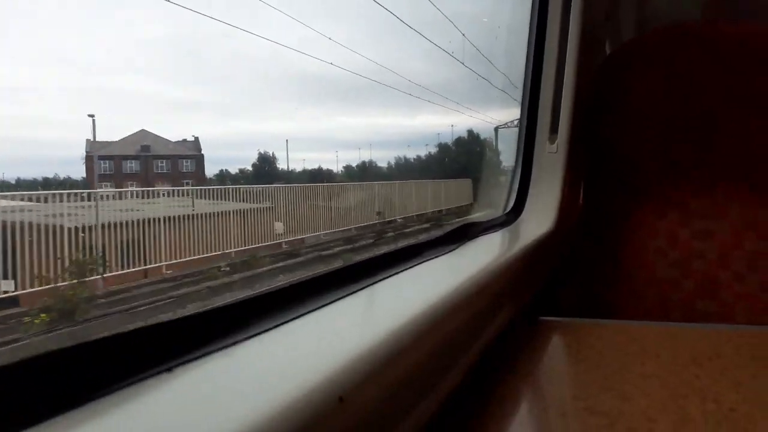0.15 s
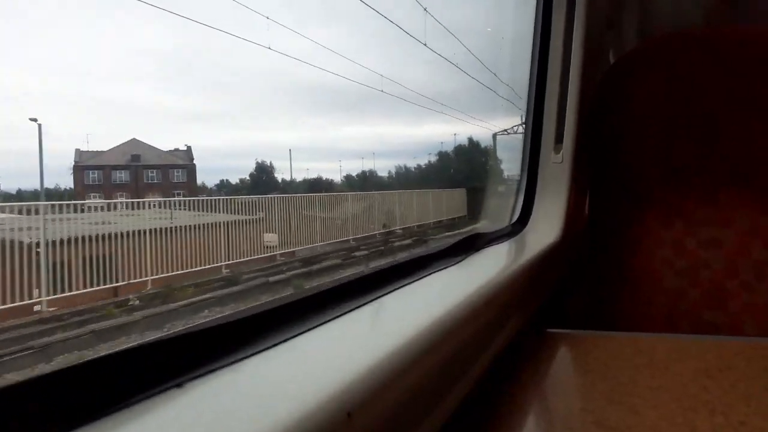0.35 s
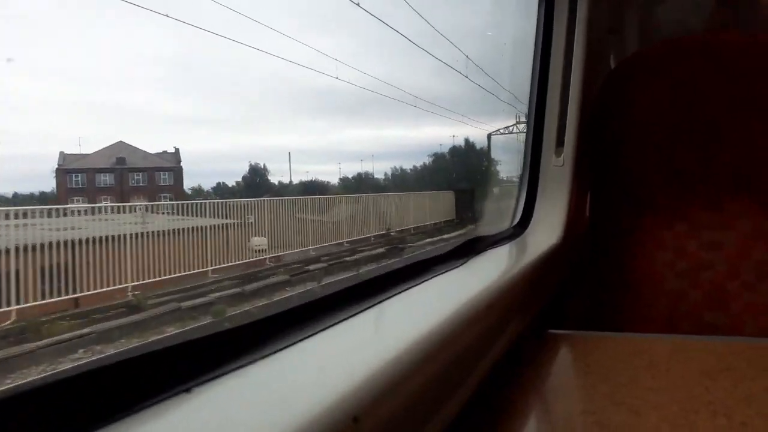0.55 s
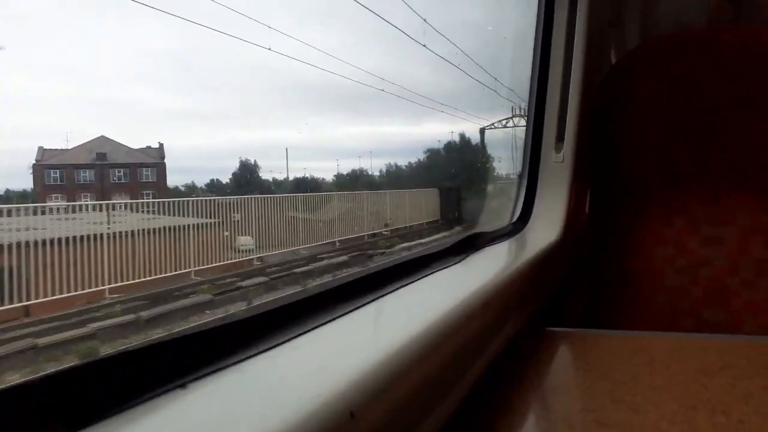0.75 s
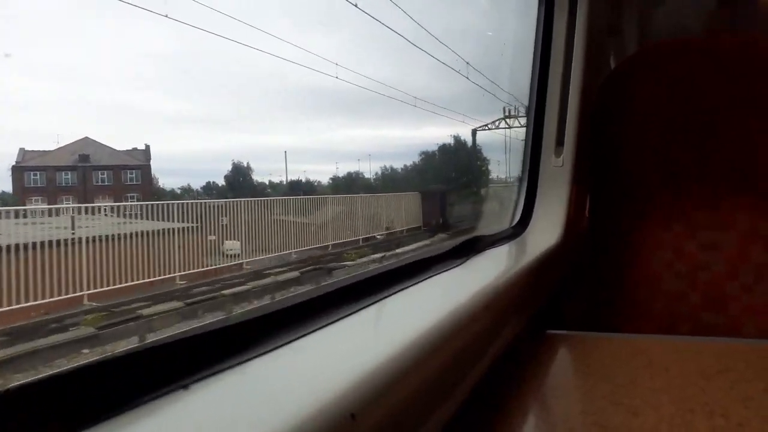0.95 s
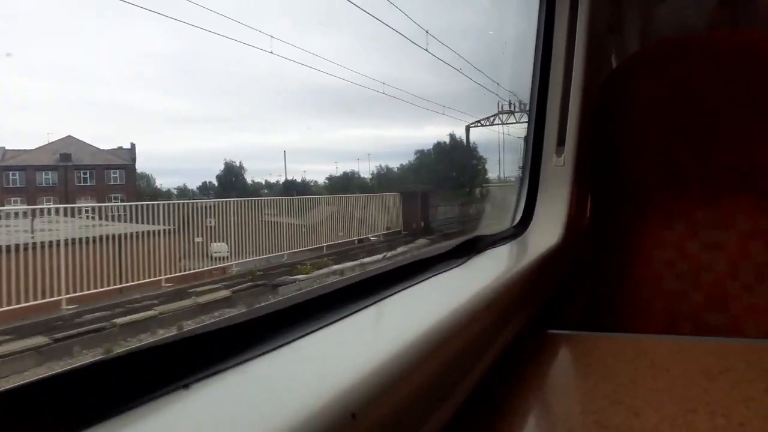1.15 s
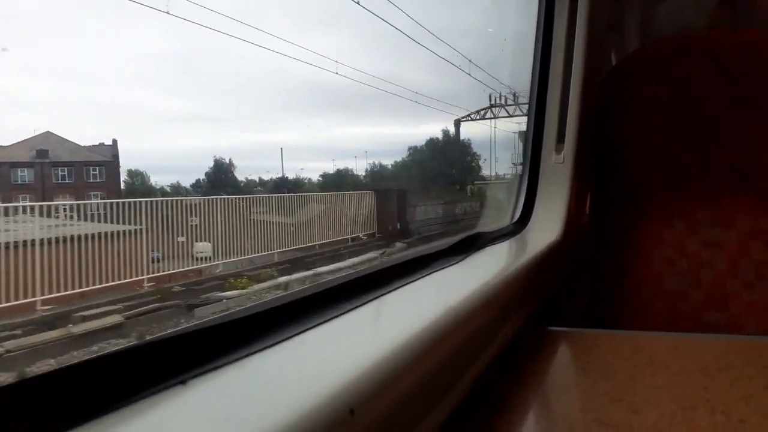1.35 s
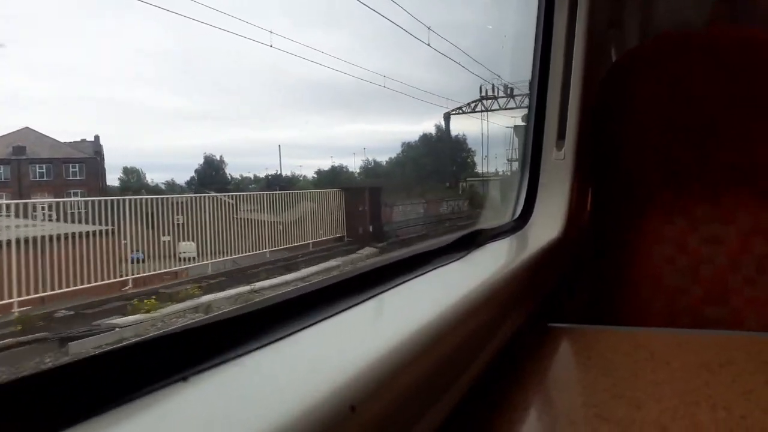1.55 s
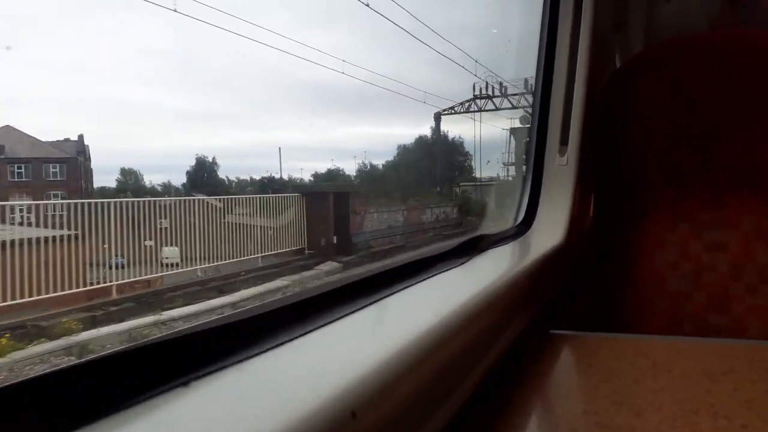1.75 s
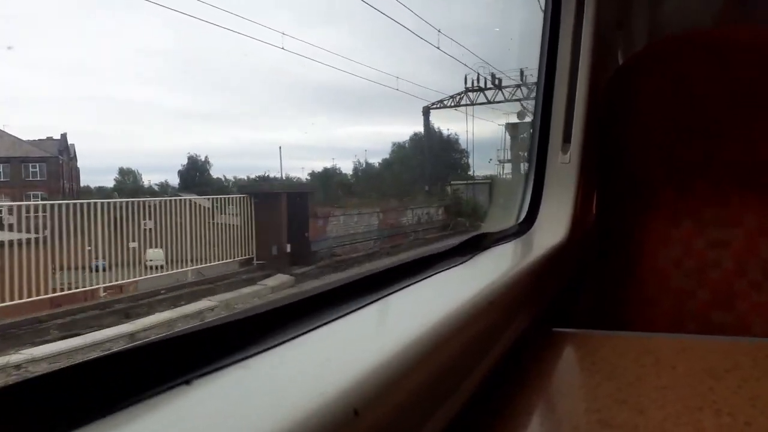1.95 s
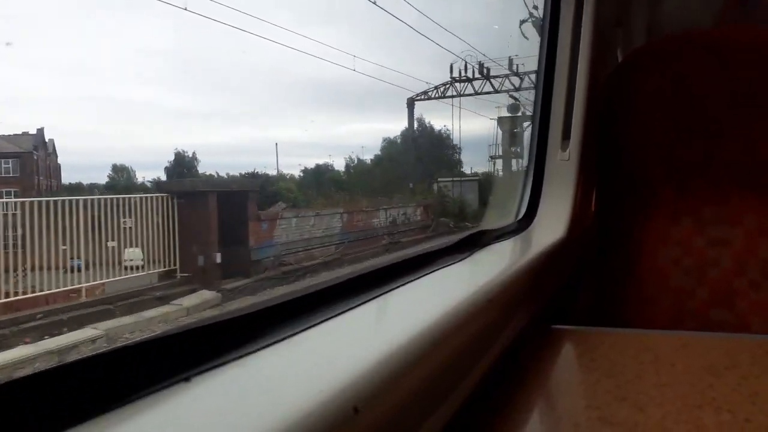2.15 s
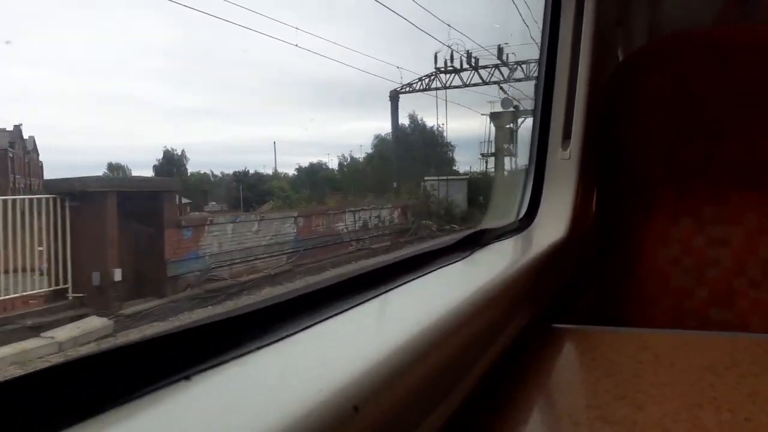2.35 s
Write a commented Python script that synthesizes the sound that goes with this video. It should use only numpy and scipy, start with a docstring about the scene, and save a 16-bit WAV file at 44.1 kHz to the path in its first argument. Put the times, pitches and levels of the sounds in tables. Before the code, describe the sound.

Train wheels rumble deeply throughout, heard from a window seat inside an electric train, with faint hiss and slowly sinking gear whines. Loose fittings knock lightly, with a clack near 0.6 seconds. From about 1 second the wheels swell and thud over rough track, loudest around 1.5 seconds, leaving the carriage booming until the end at 2.5 seconds. Faint panel creaks and soft rustles come and go.

```python
"""Train wheels rumble through the floor, heard from a window seat inside a moving electric train.
On a rough stretch of track they swell and thud, leaving the carriage body booming.
Behind them air hisses, the electrics whistle faintly and gear whines sink as the train slows.
Loose fittings knock and clack, wall panels creak and something rustles softly nearby."""
import sys
import numpy as np
from scipy import signal
from scipy.fft import rfft, irfft
from scipy.io import wavfile
from scipy.ndimage import uniform_filter1d

SR = 44100
rng = np.random.default_rng(int(sys.argv[2]) if len(sys.argv) > 2 else 0)


def log_audio(samples):
    """Write samples as a 16-bit WAV file to the path given in sys.argv[1]."""
    # one column per channel
    frames = np.atleast_2d(samples).T
    # limit to full scale, then quantise
    limited = np.clip(frames, -1, 1)
    pcm = np.round(limited * 32767).astype(np.int16)
    wavfile.write(sys.argv[1], SR, pcm)


N = 110250
TIME, FREQ = np.arange(N) / SR, np.fft.rfftfreq(N, 1 / SR)
FITTING_RISE_S, FITTING_RIPPLE_DB, FITTING_RIPPLE_HZ = 0.0037, 4, 110


def amp(db):
    """Turns decibels into a number to multiply a sound by."""
    return np.exp(np.maximum(db, -200) * (np.log(10) / 20))


def unit(x):
    """Scales a signal to an average power of 1."""
    return x / np.sqrt(np.mean(abs(x) ** 2) + 1e-20)


def spectrum(points):
    """Joins (pitch_hz, level_db) points into a tone colour: decibels at every pitch."""
    hz, db = np.transpose(points)
    return np.interp(np.log(FREQ + 1), np.log(hz), db)


def level(points):
    """Joins (time_s, level_db) points into a volume curve."""
    return amp(np.interp(TIME, *np.transpose(points)))


def drift(hz):
    """A smooth random wobble, in complex numbers; more hz makes it faster."""
    size = N // 32
    noise = rng.standard_normal(size) + 1j * rng.standard_normal(size)
    rates = np.fft.fftfreq(size, N / size / SR)
    slow = np.fft.ifft(noise * np.exp(-(rates / hz) ** 2))
    return np.interp(TIME, np.linspace(0, N / SR, size), unit(slow))


def hump(hz, octaves):
    """A tone colour in decibels with one steep-sided peak around hz."""
    return -10 * np.log10(1 + abs(np.log2((FREQ + 1) / hz) / octaves) ** 6)


def ripple(depth_db, width_hz):
    """Many close resonances: random peaks and dips in the colour above the bass, in decibels."""
    size = max(int(width_hz * N / SR), 2)
    peaks = uniform_filter1d(uniform_filter1d(rng.standard_normal(len(FREQ)), size), size)
    return depth_db * unit(peaks) * FREQ / (FREQ + 900)


def steadied(x, seconds):
    """Evens out the slow swells of a sound."""
    power = uniform_filter1d((x ** 2).mean(0), max(int(seconds * SR), 2))
    return x / np.sqrt(abs(power) + 1e-9)


def ticks(per_s):
    """Tiny clicks at random moments, in two channels."""
    return rng.standard_normal((2, N)) * (rng.random(N) < per_s / SR)


def cabin(colour_db, drive=None):
    """Colours noise (or the given drive) as the cabin does: bass in the middle, treble all around."""
    # stereo width, as side level minus middle level: pitch_hz, level_db
    widths = [(50, -28), (100, -25), (170, -19.5), (250, -17), (370, -8.5), (700, -3.5), (1400, 0),
              (5000, 0.15), (12000, -0.5)]
    # how much louder the left is than the right: pitch_hz, level_db
    balance = [(60, -1.4), (170, 1), (350, 1.7), (700, -2.3), (1400, -0.2), (2600, -3.5), (5000, -1.3),
               (12000, -1.8)]
    mid, side = rfft(rng.standard_normal((2, N)) if drive is None else drive)
    width, tilt = amp(spectrum(widths)), amp(spectrum(balance) / 2)
    pair = np.array([(mid + width * side) * tilt, (mid - width * side) / tilt])
    gain = amp(colour_db) / np.sqrt(1 + width ** 2)
    return unit(irfft(pair * gain, N))


def whistle():
    """The electrics that drive the train give off a faint, steady, fuzzy whistle."""
    return amp(-75.5) * cabin(hump(hz=3936, octaves=0.091))


def air_hiss(panel_colour):
    """Air hisses softly with a slight flutter."""
    # colour of the hiss: pitch_hz, level_db
    colour = [(500, -20), (2000, -5), (4000, 1), (5200, -4), (8500, -3), (10000, -11.5), (15500, -6.5)]
    # its rise and fall: time_s, level_db
    loudness = [(.11, -67), (.19, -69.5), (.38, -64), (.6, -65.5), (.88, -73), (1.04, -65), (1.17, -66.5),
                (1.27, -74), (1.55, -65.5), (1.9, -76.5), (2.5, -75.5)]
    flutter_db = 1.2 * drift(hz=15).real
    return level(loudness) * cabin(spectrum(colour) + panel_colour) * amp(flutter_db)


def rustles(octaves=1.32, edge_s=0.02, fade_s=.17, snap_share=0.32):
    """Short rubs: tiny snaps in a soft hiss, dying away in the cabin."""
    # rubs: start_s, length_s, level_db, pitch_hz
    rubs = [(0.204, .12, -68, 5500), (.34, 0.083, -66, 6050), (0.608, 0.12, -60, 4540),
            (0.656, 0.029, -54, 6500), (1.527, 0.07, -59.5, 4180), (1.711, 0.044, -55.5, 4460),
            (1.745, 0.029, -48.5, 5400), (1.947, 0.068, -69.5, 3500), (2.1, 0.063, -60.5, 3500),
            (2.173, 0.057, -65, 3500), (2.303, 0.019, -64, 3800), (2.386, 0.044, -54.5, 4200),
            (2.421, 0.079, -52, 4400)]
    # resonances of the rustling material: pitch_hz, level_db
    crinkle = [(1000, -13), (2200, -3.5), (2800, -2), (3550, 8.5), (4400, 3.5), (5400, -1.5), (6100, 0),
               (7300, -5), (8400, -5.5), (10000, -14.5), (15000, -9.5)]
    out = np.zeros((2, N))
    for start, length, db, hz in rubs:
        t = np.maximum(TIME - start, 0)
        drive = snap_share * unit(ticks(per_s=2300)) + (1 - snap_share) * rng.standard_normal((2, N))
        time_fading = np.maximum(t - length + edge_s, 0)
        shape = np.minimum(t / edge_s, 1) * amp(db - 60 * time_fading / fade_s)
        colour = hump(hz, octaves) + spectrum(crinkle) + ripple(depth_db=3, width_hz=60)
        out += shape * cabin(colour, drive)
    return out


def creaks():
    """Wall panels slip in tiny steps as the carriage bends."""
    # creaks: middle_s, half_length_s, level_db, pitch_hz
    bends = [(0.63, 0.1, -55, 1980), (1.486, 0.042, -54, 1947), (1.565, 0.038, -58.5, 2300),
             (1.756, 0.038, -56.5, 1590), (2.156, 0.092, -57.5, 1790)]
    out = np.zeros((2, N))
    for middle, half_length, db, hz in bends:
        slips = ticks(per_s=1200)
        colour = hump(hz, octaves=0.41) + ripple(FITTING_RIPPLE_DB, FITTING_RIPPLE_HZ)
        swell = np.exp(-((TIME - middle) / half_length) ** 2)
        out += amp(db) * swell * cabin(colour, slips)
    return out


def gear_whines(sink_per_s=.04, waver=.55):
    """Gear tones sink as the train slows, each swelling and fading in turn."""
    # each tone at its loudest: pitch_hz, peak_s, half_length_s, level_db
    tones = [(507, 0.9, 0.14, -40), (586, 1.92, 0.59, -51.5), (624, 1.05, 0.37, -47),
             (341.8, .6, 0.67, -42), (520, 0.34, 0.23, -49), (337, 2.1, 0.29, -45.5),
             (1496, 1.1, 0.99, -68.5), (747, 1.3, 1, -59.5)]
    out = np.zeros((2, N))
    for hz, peak, half_length, db in tones:
        pitch = hz * (1 - sink_per_s * (TIME - peak))
        tone = np.exp(2j * np.pi * (np.cumsum(pitch) / SR + rng.random()))
        wavering = np.array([(tone * (1 + waver * drift(hz=9.5))).real for _ in range(2)])
        swell = np.exp(-((TIME - peak) / half_length) ** 2)
        out += amp(db) * swell * unit(wavering)
    return out


def clacks(blur_hz=90):
    """A hard fitting strikes and bounces once; echoes blur each of its ringing tones."""
    # the strike and the bounce: start_s, level_db
    hits = [(0.5672, -43.5), (.667, -54.5)]
    # the fitting's tones: pitch_hz, relative_level_db, fade_s (time to drop 60 dB)
    tones = [(880, 6, 0.28), (1590, 2.5, 0.28), (2210, 7, 0.16), (2520, -5, 0.14), (3050, 4, .17),
             (3600, 0, 0.17), (4300, -17, 0.1), (4850, -9, .13), (5400, -22, .12), (6130, -3, 0.18),
             (6821, -9, 0.26), (7800, -5, .12)]
    out = np.zeros((2, N))
    for hz, tone_db, fade_s in tones:
        tone = np.exp(2j * np.pi * hz * TIME)
        ring = np.array([unit((tone * drift(blur_hz)).real) for _ in range(2)])
        for start, db in hits:
            t = np.maximum(TIME - start, 0)
            out += np.minimum(t / FITTING_RISE_S, 1) * amp(db + tone_db - 60 * t / fade_s) * ring
    return out / np.sqrt(len(tones))


def knocks():
    """Loose fittings knock lightly, and the cabin blurs each knock into a short ring."""
    # knocks: start_s, level_db, pitch_hz, spread_octaves, fade_s
    hits = [(.131, -42, 674, 0.41, 0.6), (0.3714, -45.5, 2320, .5, .14), (0.372, -52, 5300, 0.59, 0.068),
            (0.401, -56, 6000, 0.53, .08), (.428, -30, 586, 0.28, 0.092), (.569, -43, 3200, 0.65, 0.085),
            (0.595, -33.5, 744, 0.5, 0.21), (.7557, -61, 5000, 0.58, .1), (.992, -38.5, 600, 0.41, 0.067),
            (1.047, -41, 644, 0.55, 0.047), (1.094, -41.5, 2300, 0.74, .17),
            (1.282, -36.5, 600, 0.46, 0.18), (1.438, -57.5, 10000, 0.77, .03),
            (1.495, -52, 6200, 0.46, .08), (1.628, -61, 5980, 0.44, .1), (1.931, -45, 650, 0.65, 0.071),
            (2.044, -50, 700, .6, 0.032), (2.0817, -53.5, 6000, 0.56, .025)]
    out = np.zeros((2, N))
    for start, db, hz, octaves, fade_s in hits:
        t = np.maximum(TIME - start, 0)
        shape = np.minimum(t / FITTING_RISE_S, 1) * amp(db - 60 * t / fade_s)
        out += shape * cabin(hump(hz, octaves) + ripple(FITTING_RIPPLE_DB, FITTING_RIPPLE_HZ))
    return out


def carriage_boom(waver=0.55):
    """The carriage body drones unevenly on its deepest tones."""
    # the body's tones: pitch_hz, relative_level_db
    tones = [(48, -21.5), (69.5, 2), (92, -6), (114, -8), (137, -6.5)]
    # rise and fall of the boom: time_s, level_db
    loudness = [(0, -62.5), (1.4, -39.5), (1.53, -17.5), (1.72, -20.5), (1.9, -24.5), (2.1, -27),
                (2.3, -22), (2.42, -29.5), (2.5, -34)]
    drone = np.zeros((1, N))
    for hz, db in tones:
        tone = np.exp(2j * np.pi * (hz * TIME + rng.random()))
        drone += amp(db) * (tone * (1 + waver * drift(hz=9.1))).real
    return level(loudness) * steadied(drone, seconds=0.23)


def rolling_roar(panel_colour):
    """The rolling wheels make a fluttering roar above the deep rumble."""
    # colour of the roar: pitch_hz, level_db
    colour = [(120, -28), (250, 0), (340, 1), (440, -7.5), (620, -12), (800, -18.5), (1050, -21.5),
              (1400, -29), (2300, -36), (3000, -43.5), (4000, -49), (5000, -52), (16000, -78)]
    # its rise and fall: time_s, level_db
    loudness = [(.06, -36.5), (.16, -32.5), (.33, -35), (.62, -32.5), (.85, -32), (1.0, -32), (1.15, -33.5),
                (1.33, -37.5), (1.53, -32), (1.72, -38), (1.92, -37), (2.2, -38), (2.5, -37.5)]
    roar = level(loudness) * cabin(spectrum(colour) + panel_colour)
    flutter_db = 3 * drift(hz=17).real
    return roar * amp(flutter_db)


def wheel_rumble():
    """The wheels send a deep, steady rumble through the floor."""
    # colour of the rumble: pitch_hz, level_db
    colour = [(20, -43), (32, -14), (48, -4), (70, 5.5), (100, 1), (140, -5), (190, -6.5), (235, -8),
              (290, -24), (420, -29.5), (800, -76)]
    return amp(-29) * steadied(cabin(spectrum(colour)), seconds=.2)


def rough_track():
    """The wheel noise swells over a rough stretch of track."""
    # colour of the swell: pitch_hz, level_db
    colour = [(20, -55.5), (38, -33.5), (55, -8.5), (85, -1.5), (115, 3.5), (145, -2.5), (180, -10),
              (245, -9.5), (310, -18), (450, -27), (900, -38.5), (2000, -53), (5000, -82)]
    # its rise and fall: time_s, level_db
    loudness = [(0, -26.5), (.85, -35), (1.04, -20), (1.22, -23.5), (1.34, -14), (1.42, -19), (1.52, -16.5),
                (1.62, -20), (1.78, -33), (2.5, -40.5)]
    return level(loudness) * steadied(cabin(spectrum(colour)), seconds=0.078)


def wheel_thuds(rise_s=.005, low_cut_hz=52):
    """Wheels strike joints in the rails and set the floor ringing with low tones."""
    # wheel strikes: start_s, relative_level_db
    strikes = [(0.11, -32), (0.447, -24), (0.599, -13), (1.031, -38.5), (1.191, -14), (1.281, -17),
               (1.347, -13), (1.462, -5.5), (1.516, -16)]
    # the floor's tones: pitch_hz, relative_level_db, fade_s
    floor_tones = [(74.2, -5.5, 0.25), (96, -8.5, 0.17), (116.1, 7.5, 0.13), (143.6, 4.5, 0.17),
                   (190.4, -8, .1), (234.5, -2, .12), (296.5, -19.5, 0.13)]
    out = np.zeros(N)
    for start, db in strikes:
        t = np.maximum(TIME - start, 0)
        ring = np.zeros(N)
        for hz, tone_db, fade_s in floor_tones:
            pitch = hz * (1 + rng.normal(0, 0.013))  # no two thuds ring quite alike
            ring += amp(tone_db - 60 * t / fade_s) * np.sin(2 * np.pi * pitch * t)
        out += .5 * amp(db) * (1 - np.exp(-t / rise_s)) * ring
    return signal.sosfilt(signal.butter(3, low_cut_hz, "high", fs=SR, output="sos"), out)


def scene():
    """Everything heard from the window seat, added together."""
    panel_colour = ripple(depth_db=1.6, width_hz=30.16)
    running = wheel_rumble() + rolling_roar(panel_colour) + rough_track() + air_hiss(panel_colour)
    train = running + wheel_thuds() + carriage_boom() + gear_whines() + whistle()
    return train + knocks() + clacks() + creaks() + rustles()


def record(dry):
    """Cuts away the very highest treble."""
    cutoff_hz = 15750
    low_pass = signal.firwin(511, cutoff_hz, window=("kaiser", 9), fs=SR)
    return signal.oaconvolve(dry, low_pass[None], "same")


dry = scene()
out = record(dry)
log_audio(out)
```